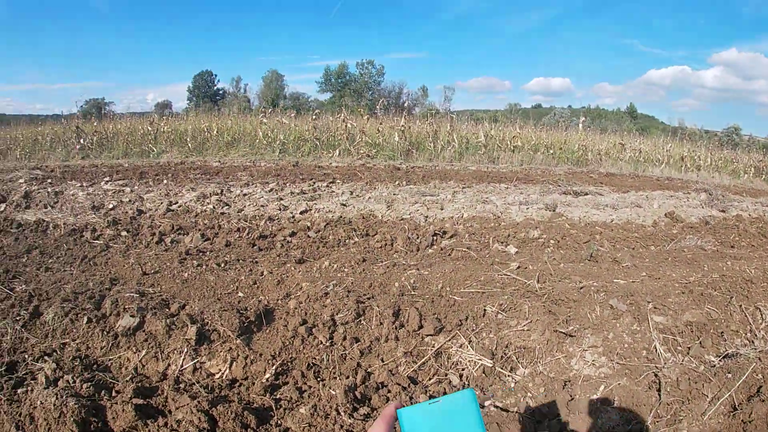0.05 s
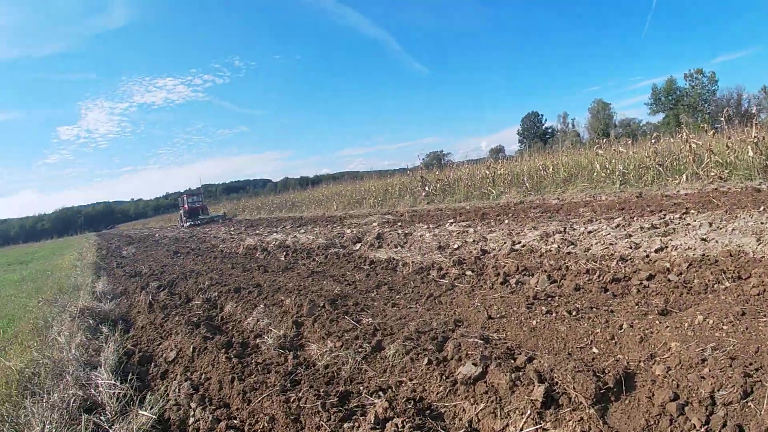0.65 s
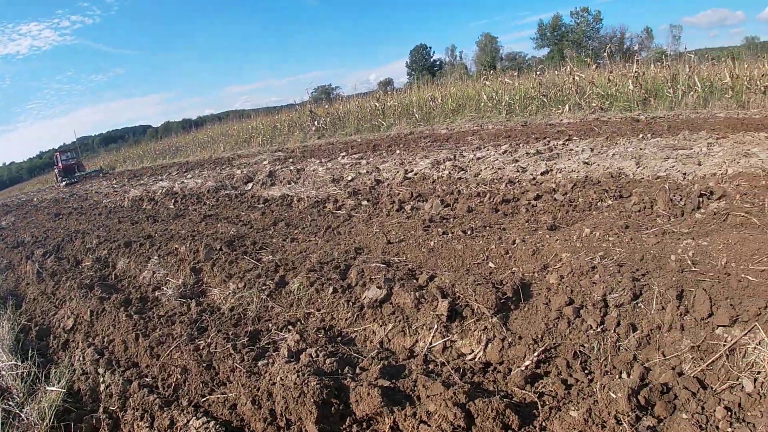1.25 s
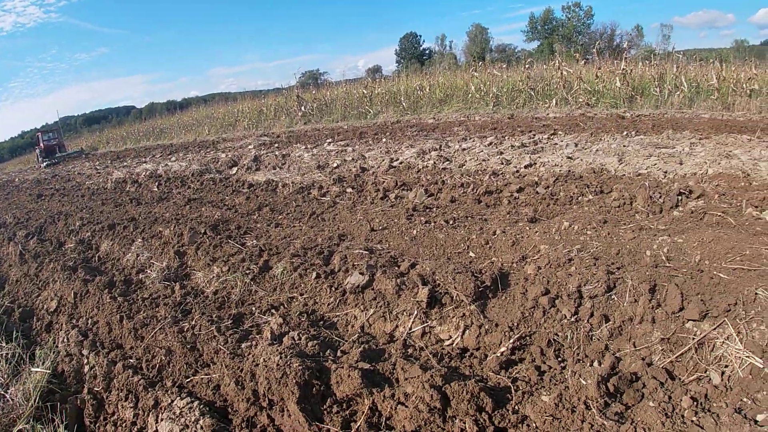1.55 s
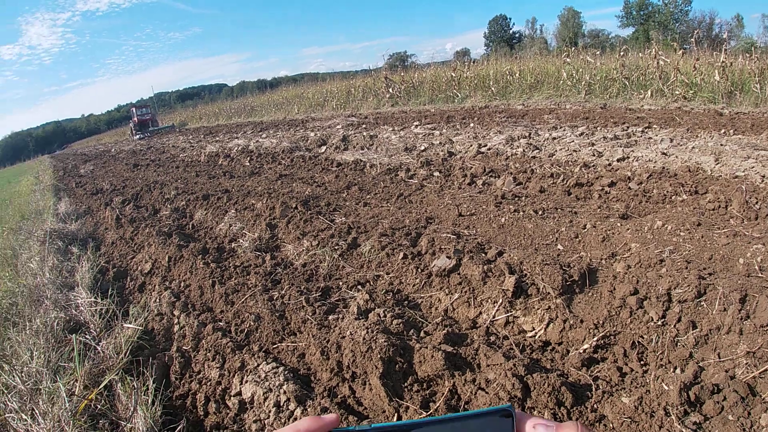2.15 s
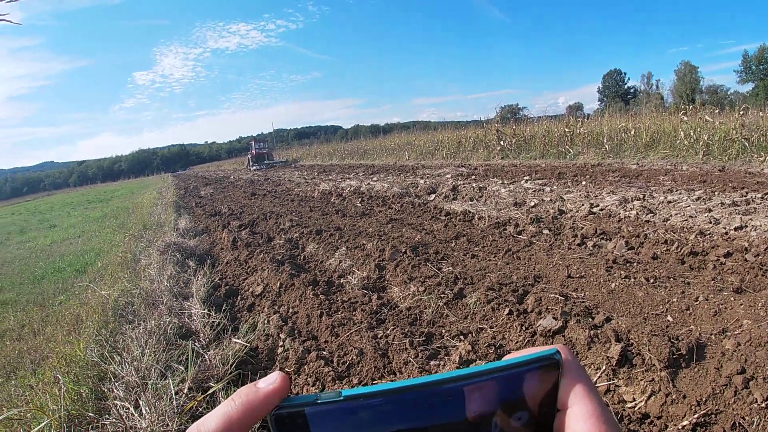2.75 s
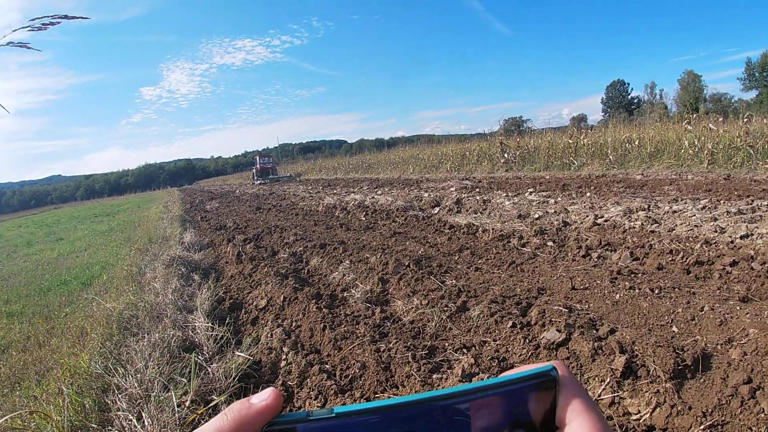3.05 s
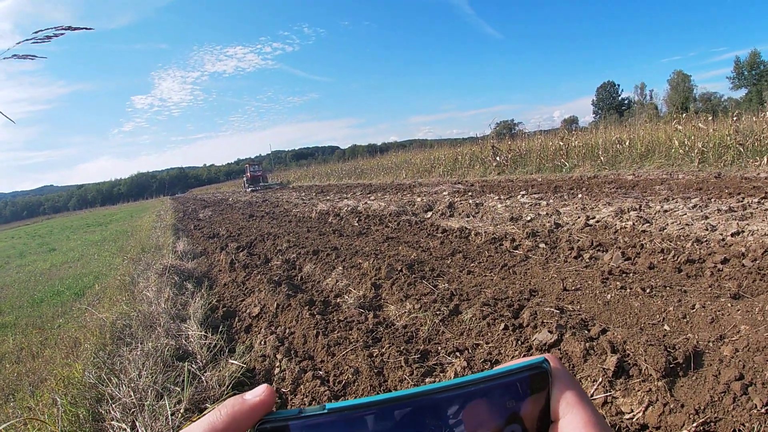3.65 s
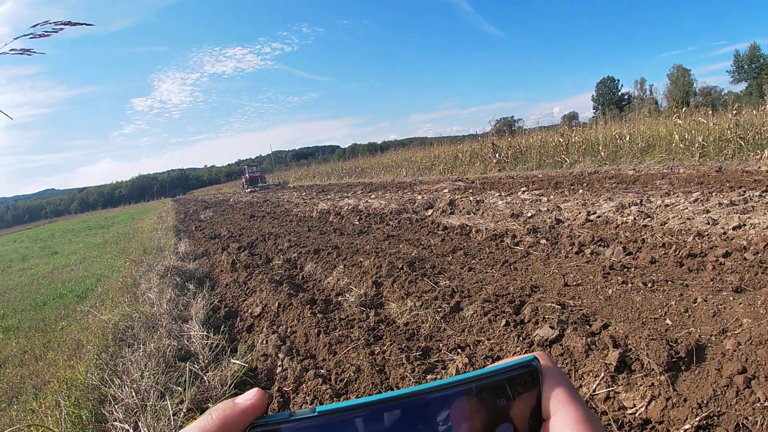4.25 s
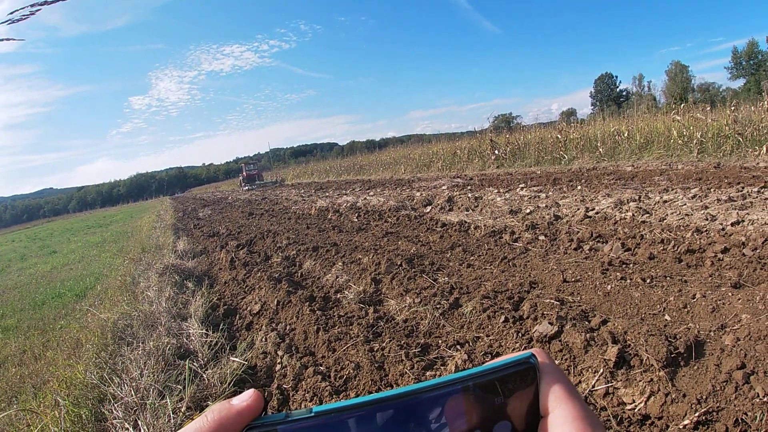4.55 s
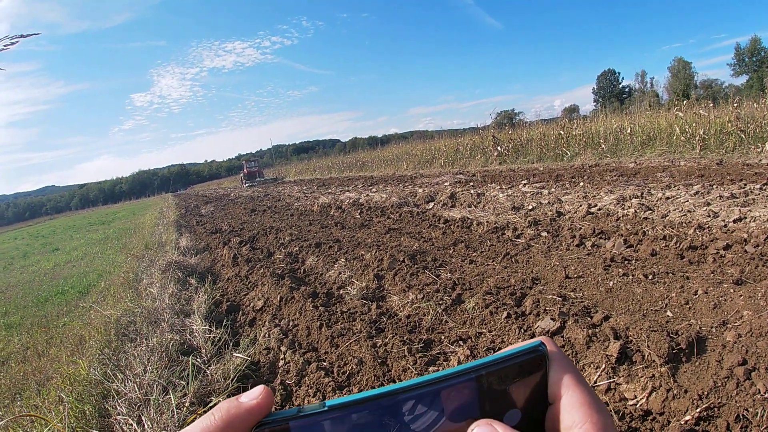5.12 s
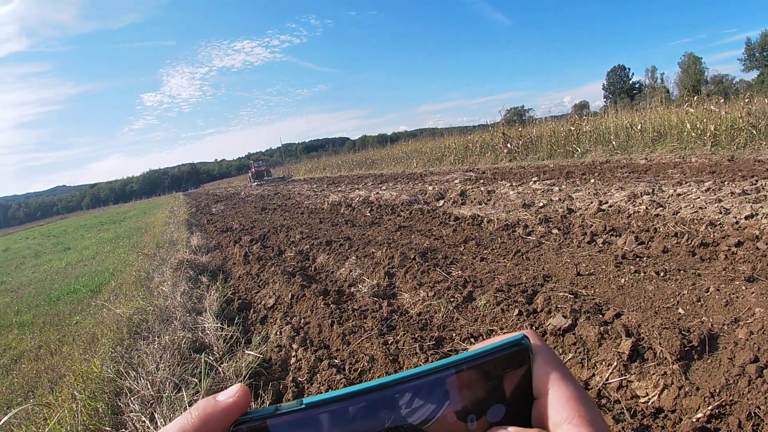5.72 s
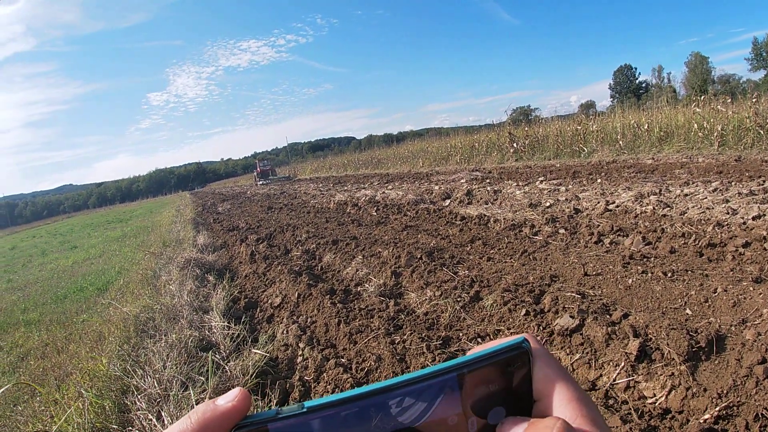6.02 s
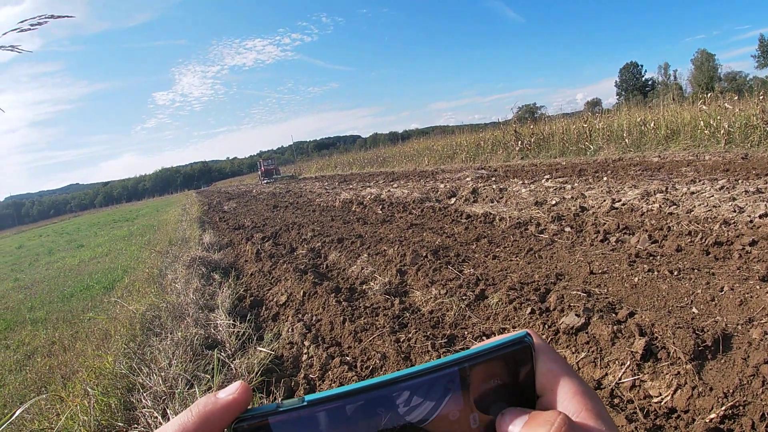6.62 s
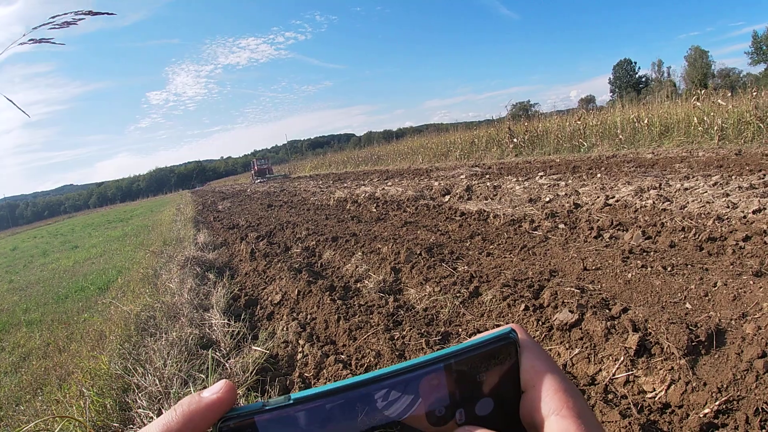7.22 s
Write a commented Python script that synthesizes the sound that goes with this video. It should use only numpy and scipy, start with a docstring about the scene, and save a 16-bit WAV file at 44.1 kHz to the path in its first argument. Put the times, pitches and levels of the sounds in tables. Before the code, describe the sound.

A distant diesel tractor hums and clatters over softly rustling dry leaves, while wind gusts buffet the microphone and plastic creaks once.

```python
"""A deep two-note exhaust hum, with faint clatter and a gear whine: a diesel tractor ploughs far down a
field. Dry maize and grass rustle, and a few stalks snap. A hand-held device comes up in front of the
body-worn camera and shades the treble. Gusts buffet the microphone and make the gain control duck,
and near the end the camera's plastic mount sticks and slips in one short creak."""
import sys
import numpy as np
from scipy import signal
from scipy.fft import rfft, irfft
from scipy.io import wavfile
from scipy.ndimage import uniform_filter1d, minimum_filter1d

SR = 44100
rng = np.random.default_rng(int(sys.argv[2]) if len(sys.argv) > 2 else 0)


def inscribe(sig):
    """Save sig as 16-bit PCM at rate SR to the path in sys.argv[1].

    A 1-D sig is mono; a 2-D sig holds one channel per row.
    Samples are clipped to [-1, 1] before scaling.
    """
    pcm = np.round(np.clip(np.atleast_2d(sig).T, -1, 1) * 32767)
    wavfile.write(sys.argv[1], SR, pcm.astype(np.int16))


N = 329860


def undb(db):
    """Decibels to gain."""
    return 10 ** (np.asarray(db) / 20)


def unit(x):
    """Scale to rms 1."""
    return x / np.sqrt(np.mean(x ** 2))


def peak(x, db):
    """Scale to a peak level."""
    return undb(db) * x / np.abs(x).max()


def add(out, s, x):
    """Mix x in at time s."""
    i = int(s * SR)
    out[i:i + len(x)] += x[:N - i]


def curves(rows):
    """Automation: one curve for each column after the time, one value a sample."""
    times, *columns = np.transpose(rows)
    return [np.interp(np.arange(N) / SR, times, column) for column in columns]


def swell(start, length, attack, release):
    """An envelope that grows until start, holds at 1 and dies away; times in seconds."""
    t = np.arange(N) / SR - start
    exponent = np.minimum(t, 0) / attack - np.maximum(t - length, 0) / release
    return np.exp(np.maximum(exponent, -40))


def noise():
    """White noise."""
    return rng.standard_normal(N)


def burst(t60):
    """A short rush of noise that falls 60 dB in t60 seconds."""
    t = np.arange(int(.1 * SR)) / SR
    return np.exp(-np.log(1000) * t / t60) * rng.standard_normal(len(t))


def drift(rate):
    """Smooth random modulation, with rate new values a second and a spread near 1."""
    hold = int(SR / rate)
    steps = np.repeat(rng.standard_normal(N // hold + 1), hold)
    return 1.3 * uniform_filter1d(uniform_filter1d(steps, hold), hold)[:N]


def colour(x, points):
    """EQ by a curve of (frequency [Hz], gain [dB]), then scale to rms 1."""
    hz, db = np.transpose(points)
    bins_hz = np.maximum(np.fft.rfftfreq(N, 1 / SR), 1)
    gain = undb(np.interp(np.log(bins_hz), np.log(hz), db))
    return unit(irfft(rfft(x) * gain, N))


def lowpass(x, hz, order):
    """Butterworth low-pass."""
    return signal.sosfilt(signal.butter(order, hz, fs=SR, output="sos"), x)


def resonance(x, hz, width):
    """A band-pass applied twice: steep skirts, dark valleys."""
    b, a = signal.iirpeak(hz, hz / width, fs=SR)
    return signal.lfilter(b, a, signal.lfilter(b, a, x))


# Fader ride of the dry leaves: (time [s], relative level [dB])
LEAF_LEVEL = [(0, -51.5), (.15, -50.5), (.27, -48), (.53, -50.5), (.62, -47.5), (1.1, -48.5), (1.5, -48.5),
              (1.62, -47.5), (1.76, -48.5), (2.12, -47), (2.24, -45.7), (2.42, -50.5), (2.68, -53.3),
              (3.0, -51), (3.4, -49.5), (3.8, -50), (4.2, -52.5), (4.7, -53), (5.1, -50.5), (5.38, -54),
              (5.8, -51), (6.2, -51), (6.72, -49.3), (7.0, -51.5), (7.48, -51)]
# Their EQ in the open and behind the hand: (frequency [Hz], relative gain [dB])
LEAF_EQ_OPEN = [(800, 3.5), (1750, 2), (2500, -4), (3300, 2.5), (5000, 0.5), (6300, -2), (7500, -4),
                (8300, -9), (9000, -13.5), (10000, -18), (11000, -33), (12000, -40.5), (14000, -50)]
LEAF_EQ_SHADED = [(800, 1.5), (1500, 1), (1780, 14.5), (2000, 8), (2350, 6), (2700, 9.5), (3050, 6),
                  (3600, -2.5), (4030, 4.5), (4550, 0.5), (5200, 2.5), (5900, -1), (6650, -14.5),
                  (7600, -20.5), (8700, -32), (11400, -28), (14000, -49.5)]

def leaves(shade):
    """Countless dry leaves tick together into a soft hiss."""
    level_db, = curves(LEAF_LEVEL)
    ticks = (rng.random(N) < 1500 / SR) * rng.choice([-1, 1], N)  # about 1500 a second
    tick_db = 3.9 * np.minimum(rng.exponential(size=N), 3)
    drive = noise() + 2.0 * ticks * undb(tick_db)
    hiss = (1 - shade) * undb(4.0) * colour(drive, LEAF_EQ_OPEN)
    hiss += shade * undb(4.5) * colour(drive, LEAF_EQ_SHADED)
    # Facing the ground hollows out the treble; the cupped hand adds a sheen.
    turned, = curves([(.15, 0.69), (.27, 0.43), (.52, 0.085), (.6, 0)])
    cupped, = curves([(2.65, 0.034), (2.9, 0.27), (3.9, 0.67), (5.1, 0.34), (5.35, 0)])
    hiss = hiss - turned * resonance(hiss, 5100, 4500) + cupped * resonance(hiss, 5760, 1500)
    return hiss * undb(level_db + 0.76 * drift(30))


# Dry stalks breaking: (time [s], peak [dB])
STALK_SNAPS = [(1.955, -34), (3.395, -33), (5.823, -37.5), (5.897, -35)]

def snaps():
    """A dry stalk gives way with a faint tick, dulled by the distance."""
    out = np.zeros(N)
    for s, db in STALK_SNAPS:
        tick = resonance(burst(t60=0.038), hz=2450, width=1400)
        add(out, s, peak(lowpass(tick, 5200, order=6), db))
    return out


# The bed of breeze: (time [s], relative rumble [dB], relative flutter [dB])
BREEZE_BED = [(2.2, -29, -33.5), (2.65, -19, -39.5), (3.0, -33.5, -55), (3.3, -25.5, -50),
              (3.8, -21.5, -44.5), (4.3, -23, -45), (4.7, -15, -42), (5.25, -18.5, -37),
              (5.42, -25.5, -32.5), (5.62, -31.5, -47), (5.8, -32, -46), (6.2, -36.5, -41),
              (7.48, -37, -37.5)]
# Gusts on top of it: (start [s], hold [s], relative rumble [dB], relative flutter [dB])
GUST_CUES = [(2.355, 0.11, -17.5, -25), (2.47, 0.095, -14, -17.5), (2.663, 0.02, -26, -28),
             (3.17, 0.073, -23, -45), (3.416, 0.03, -16, -31), (3.499, 0.088, -18, -44),
             (3.654, 0.026, -13.5, -29.5), (3.76, 0.033, -14, -35.5), (3.892, 0.052, -11.5, -29),
             (3.986, 0.087, -11, -33), (4.395, .11, -18.5, -38), (4.578, 0.045, -11.5, -22.5),
             (4.744, .11, -22.5, -38), (4.94, 0.1, -11.5, -26), (5.109, 0.067, -9, -6),
             (5.226, 0.039, -10, -15), (5.293, 0.046, -16, -19.5), (5.493, .025, -28, -31),
             (5.675, .015, -32, -36), (5.937, 0.055, -28, -30.5), (6.136, .02, -38, -35),
             (6.242, 0.05, -30, -31), (6.371, 0.085, -26, -23.5), (6.54, 0.015, -22, -39),
             (6.686, .025, -28, -46), (6.767, .03, -27.5, -34.5), (6.835, .02, -32, -33),
             (7.032, 0.046, -28.5, -42)]

def wind_envelopes():
    """Rumble and flutter gains: gusts add their power to a breeze that wanders by chance."""
    power = undb(curves(BREEZE_BED) + 2.5 * drift(18)) ** 2
    for start, length, rumble_db, flutter_db in GUST_CUES:
        gust = swell(start, length, attack=0.017, release=0.021)
        power += np.outer(undb([rumble_db, flutter_db]), gust) ** 2
    return np.sqrt(power)


def turbulence(eq, eddy_s):
    """Pressure swings of about even strength from one eddy to the next."""
    pressure = colour(noise(), eq)
    local_power = uniform_filter1d(pressure ** 2, int(eddy_s * SR))
    return pressure / np.sqrt(local_power + 0.044)


# EQ of the large, small and finest eddies: (frequency [Hz], relative gain [dB])
RUMBLE_EQ = [(10, -12.5), (24, 2.5), (36, 6), (48, 5), (80, 4), (125, 1), (170, -13), (230, -23.5),
             (400, -70.5), (4000, -110)]
FLUTTER_EQ = [(85, -2.5), (130, 10), (180, 7.5), (235, 2.5), (330, -9), (480, -23.5), (700, -34.5),
              (1200, -49.5), (2500, -80.5), (10000, -120)]
FINE_EQ = [(150, -18), (340, 1.5), (500, -4.5), (700, -13.5), (1000, -21), (1500, -37.5), (3000, -80),
           (10000, -110)]

def wind():
    """Large eddies rumble and tear into smaller ones; the finest appear only in the hardest gusts."""
    rumble_gain, flutter_gain = wind_envelopes()
    fine_gain = flutter_gain ** 1.91 * undb(-4.5)  # grows 1.91 dB per dB of flutter
    exposed, = curves([(2.18, 0.061), (2.34, 0.82)])  # the microphone port turns into the wind
    rumble = turbulence(RUMBLE_EQ, eddy_s=0.089)
    tearing = unit(0.94 + np.abs(rumble))  # small eddies ride on the crests of the large ones
    flutter = turbulence(FLUTTER_EQ, eddy_s=0.047) * flutter_gain
    fine = turbulence(FINE_EQ, eddy_s=0.017) * fine_gain
    puffs = undb(1.5 * drift(45))
    return exposed * puffs * (rumble * rumble_gain + tearing * (flutter + fine))


# Large eddies crossing the port: (time [s], peak [dB], length of the suction [ms])
EDDY_THUMPS = [(2.355, -8.5, 4.6), (2.413, -9.5, 4.5), (2.482, -10, 6.6), (2.547, -5, 13), (2.566, -5, 5.8),
               (3.179, -15.5, 11), (3.413, -8, 6.7), (3.685, -9.5, 6.7), (3.789, -14, 5.1),
               (3.898, -6.5, 6.1), (3.935, -8, 13.4), (3.994, -10, 9.5), (4.03, -5.5, 7.7),
               (4.489, -6.5, 10.4), (4.618, -8.5, 9.4), (4.964, -13, 8), (5.045, -8.5, 6.1),
               (5.094, -3.5, 15.4), (5.136, -2, 7.4), (5.291, -4, 6.3)]

def thumps():
    """A large eddy sweeps over the port: a dull dip of suction between two gentle pushes."""
    out = np.zeros(N)
    t_ms = np.arange(-40, 40, 1000 / SR)
    for s, db, length_ms in EDDY_THUMPS:
        u = 2 * t_ms / length_ms
        pressure = (u ** 2 - 1) * np.exp(-u ** 2 / 2)
        add(out, s + t_ms[0] / 1000, undb(db) * pressure)
    return out


# Single eddies striking the port: (time [s], peak before the mesh [dB], rise time scale [ms])
EDDY_HITS = [(2.364, -21, 1.9), (2.467, -20, 0.45), (2.477, -15.5, 1.3), (2.498, -10.5, 0.97),
             (2.523, -10.5, 1.2), (2.5405, -13.5, 0.82), (2.562, -11, 1.36), (2.59, -16.5, 1.1),
             (2.636, -19.5, 1.6), (2.678, -18.5, 1.4), (3.648, -21, 1.7), (3.894, -20.5, 0.54),
             (4.597, -16.5, 1.3), (4.845, -23, 1.2), (5.093, -14, 1.08), (5.106, -8, 0.65),
             (5.117, -11, 0.6), (5.1275, -5, 0.45), (5.14, -9.5, 0.85), (5.147, -11, 0.93),
             (5.159, -1.5, 0.54), (5.174, -8, 0.4), (5.186, -18, 0.8), (5.236, -13.5, 0.9), (5.318, -17, 1),
             (5.348, -18.5, 1.7), (6.384, -15, 1.7), (6.412, -15, 1.5), (6.427, -15, 1.4),
             (6.452, -19, 1.2), (7.211, -20.5, 1.5), (7.226, -16, 1.4), (7.447, -13, 1.87)]

def buffets():
    """An eddy hits the port squarely: pressure jumps, then swings back into suction."""
    out = np.zeros(N)
    t_ms = 1000 * np.arange(int(.03 * SR)) / SR
    for s, db, rise_ms in EDDY_HITS:
        u = t_ms / rise_ms
        pressure = u ** 3 * (2 - u) * np.exp(-2 * u)
        add(out, s, peak(pressure, db))
    return lowpass(out, 830, order=4)  # the port's mesh rounds the edge


# Modes of the plastic shell: (nominal frequency [Hz], width [Hz], gain [dB])
SHELL_MODES = [(603, 400, -9.5), (1100, 600, -3.5), (1690, 160, 0), (2320, 390, 3), (2540, 340, 4),
               (2860, 210, 4.5), (3700, 270, -21), (5460, 560, -8), (6400, 520, -13.5), (7220, 510, -12),
               (8750, 400, -24)]

def shell(x, tuning, low_db, high_db):
    """The plastic shell rings; its pitch and the balance of its modes shift with the point of contact."""
    out = 0
    for hz, width, db in SHELL_MODES:
        contact_db = np.interp(hz, [1750, 2300, 3700, 5400], [low_db, 0, 0, high_db])
        out += undb(db + contact_db) * resonance(x, hz * tuning, width)
    return out


# Slips of the mount:
# (time [s], drive [dB], decay [s], shell tuning [ratio], low-mode trim [dB], high-mode trim [dB])
MOUNT_SLIPS = [(6.999, -24.5, .07, 0.96, 3, -9), (7.0257, -23, .03, 1.1, 3, -1),
               (7.031, -8, 0.035, 1.0, 0.5, -3.5), (7.0435, -15, 0.017, 1, 0, -2),
               (7.0577, -9, 0.016, 1.0, -0.5, -1), (7.065, -17, 0.03, 1, 1, -7),
               (7.0724, -9, .02, .97, 3, 3), (7.076, -15, .018, .98, 1, -1),
               (7.1045, -15, 0.041, 1.04, 0.5, -1), (7.1212, -10, 0.049, 1.0, -1, 1),
               (7.131, -16, 0.028, .97, -0.5, 1), (7.1457, -26, .015, 1, -3, -3),
               (7.151, -19, .07, 1.03, 3, 6)]

def creak():
    """Plastic sticks and slips: sharp cracks over a dry scrape, both ringing the shell."""
    rub = swell(start=7.024, length=0.12, attack=0.016, release=0.01)
    scrape = rub * undb(-27.5 + 2.5 * drift(300)) * noise()
    body = shell(scrape, tuning=0.98, low_db=0, high_db=0)
    for s, db, t60, tuning, low_db, high_db in MOUNT_SLIPS:
        tail = burst(t60)
        crack = undb(19.5) * signal.unit_impulse(len(tail))
        add(body, s, shell(undb(db) * (crack + tail), tuning, low_db, high_db))
    return undb(3.5) * lowpass(body, 7650, order=9)


# How the engine's high notes carry over the field: (time [s], top whine trim [dB], panel ring [dB])
FIELD_CARRY = [(0, 4.5, -10), (.45, 4, -5), (.66, 2, -6), (.78, 6, -10), (.91, -7, -6.5), (1.05, -6, -5.5),
               (1.3, -3, -5.5), (1.4, 6.5, -4), (1.8, 2.5, -3.5), (2.0, -3.5, -4), (2.22, -5, -10.5),
               (2.32, 3, -11.5), (2.6, -3, -7.5)]
# Gear whine, harmonics 1 to 3: (level in the open [dB], level behind the hand [dB])
WHINE_HARMONICS = [(-61.5, -57), (-59, -55), (-57, -64)]

def gears(cycle, shade):
    """A whine locked to the crankshaft, fading in and out over the distance."""
    teeth_per_firing = 8.5
    top_db, _ = curves(FIELD_CARRY)
    out = 0
    for k, (open_db, shaded_db) in enumerate(WHINE_HARMONICS, 1):
        fading_db = top_db + 0.83 * drift(22) if k == len(WHINE_HARMONICS) else 2.0 * drift(9)
        db = open_db + shade * (shaded_db - open_db) + fading_db
        phase = 2 * np.pi * k * teeth_per_firing * cycle + .35 * drift(20)
        out += undb(db) * np.sin(phase)
    return np.sqrt(2) * out


# Fader ride of the machinery and plough: (time [s], relative level [dB])
CLATTER_LEVEL = [(0, -40.5), (.7, -39), (2.0, -42.5), (2.35, -42), (2.75, -44), (3.3, -44), (4.3, -44),
                 (5.0, -42), (5.4, -41.5), (6.1, -41.5), (6.75, -40), (7.48, -41)]
# Their EQ: (frequency [Hz], relative gain in the open [dB], relative gain behind the hand [dB])
CLATTER_EQ = [(20, 5.5, 2.5), (36.6, 19.5, 5), (116, 13.5, 4.5), (206, 0.5, 5.5), (281, -11.5, -11.5),
              (397, -8.5, -3.5), (423, -0.5, 2.5), (600, -3, -3), (714, -1.5, 2.5), (840, -0.5, 1.5),
              (960, -1.5, 0.5), (1134, -4.5, -3), (1550, -5.5, -16.5), (2870, -14, -9), (6140, -45.5, -52)]
# Modes of the engine's panels: (frequency [Hz], nominal width [Hz], relative level [dB])
PANEL_MODES = [(732, 61, -15), (975.5, 54, -6.5), (1306, 81, -15.5)]

def clatter(cycle, shade):
    """Diesel knock swells once a firing over the plough's steady churn and rings the engine's panels."""
    level_db, = curves(CLATTER_LEVEL)
    _, ring_db = curves(FIELD_CARRY)
    hz, open_db, shaded_db = np.transpose(CLATTER_EQ)
    knock = 1.6 * np.exp(-(cycle % 1) / .3) * undb(2.3 * drift(55))
    drive = noise() * (1 + knock)
    ring = sum(undb(db) * unit(resonance(noise() * knock, f, width)) for f, width, db in PANEL_MODES)
    in_open = colour(drive, np.c_[hz, open_db]) + undb(ring_db) * ring
    shaded = colour(drive, np.c_[hz, shaded_db]) + undb(-12) * ring
    blend = (1 - shade) * undb(4.5) * in_open + shade * undb(2.0) * shaded
    return blend * undb(level_db + 0.26 * drift(7.7))


# The machinery's hardest knocks: (time [s], peak of the ring [dB])
HARD_KNOCKS = [(0.492, -36), (.611, -34), (.63, -30), (.668, -31), (.767, -33.5), (.9, -32), (.938, -33),
               (1.425, -39), (2.079, -36), (5.895, -36), (6.932, -33.5)]

def knocks():
    """Now and then a hard knock stands out of the clatter: ringing panels and a toneless clank."""
    out = np.zeros(N)
    for s, db in HARD_KNOCKS:
        clank = resonance(burst(t60=.025), hz=900, width=700)
        blow = signal.unit_impulse(len(clank))
        ring = sum(undb(mode_db) * resonance(blow, hz, 2 * width) for hz, width, mode_db in PANEL_MODES)
        add(out, s, peak(ring, db) + peak(clank, db - 7))
    return out


# Fader ride of the exhaust hum: (time [s], relative level [dB], trim on the fundamental [dB])
HUM_LEVEL = [(0, -28, 2), (.5, -26, 2), (.9, -24, -1), (1.4, -25, -1.5), (2.2, -24.5, 1), (3, -26, -1),
             (4.3, -26, 4.5), (5.5, -35.5, 3.5), (6.7, -32, -5.5), (7.48, -36, 3)]
# Its partials: (frequency [multiple of the firing rate], relative level [dB])
HUM_PARTIALS = [(.5, -54.5), (1, 0.5), (1.5, -24), (2, -2.5), (2.5, -44), (3, -26), (3.5, -43.5),
                (4, -31.5), (4.5, -34.5)]

def exhaust(cycle):
    """The pipe passes only the lowest harmonics of the firings; moving air makes each waver."""
    hum_db, fundamental_db = curves(HUM_LEVEL)
    out = 0
    for multiple, db in HUM_PARTIALS:
        waver = undb(.6 * drift(9) + .55 * drift(30))
        gain = undb(db + fundamental_db * (multiple == 1))
        out += gain * waver * np.cos(2 * np.pi * multiple * cycle)
    return -np.sqrt(2) * out * undb(hum_db)


# Engine speed: (time [s], firing rate [Hz])
FIRING_RATE = [(0, 50.9), (.5, 50.7), (1.05, 52.3), (1.5, 51.3), (1.9, 51.5), (2.6, 52.3), (7.48, 52.1)]

def tractor(shade):
    """One diesel engine sets the pace of hum, whine and clatter; stray knocks fall on top."""
    firing_hz, = curves(FIRING_RATE)
    cycle = np.cumsum(firing_hz) / SR  # running count of firings
    return exhaust(cycle) + gears(cycle, shade) + clatter(cycle, shade) + knocks()


def scene():
    """The mono mix: tractor and leaves across the field, wind and creak at the microphone."""
    # The hand rises in front of the microphone: 0 is open, 1 is fully shaded.
    shade, = curves([(2.34, 0.3), (2.5, 0.54), (2.65, 0.68)])
    field = tractor(shade) + leaves(shade) + snaps()
    return (field + wind() + thumps() + buffets() + creak())[None]


def gain_control(x, knee_db=-19.5, time_s=0.37, slope=0.44):
    """The gain falls with the recent power, so each gust ducks the field, which then creeps back."""
    pole = np.exp(-1 / (time_s * SR))
    power = signal.lfilter([1 - pole], [1, -pole], x ** 2)
    return x / (1 + power / undb(knee_db) ** 2) ** slope


def limiter(x, ceiling_db=-3.5, window_s=.008):
    """A quick dip of the gain holds the hardest buffets under the ceiling."""
    size = int(window_s * SR)
    gain = undb(ceiling_db) / np.maximum(np.abs(x), undb(ceiling_db))
    return x * uniform_filter1d(minimum_filter1d(gain, size), size)


def record(dry):
    """The camera drops the infrasound, rides the gain, limits the peaks and cuts the top."""
    low_cut = signal.butter(2, 14, "high", fs=SR, output="sos")
    high_cut = signal.ellip(8, .2, 70, 14400, fs=SR, output="sos")
    ducked = gain_control(signal.sosfilt(low_cut, dry))
    return signal.sosfilt(high_cut, limiter(ducked))


dry = scene()
out = record(dry)
inscribe(out)
```